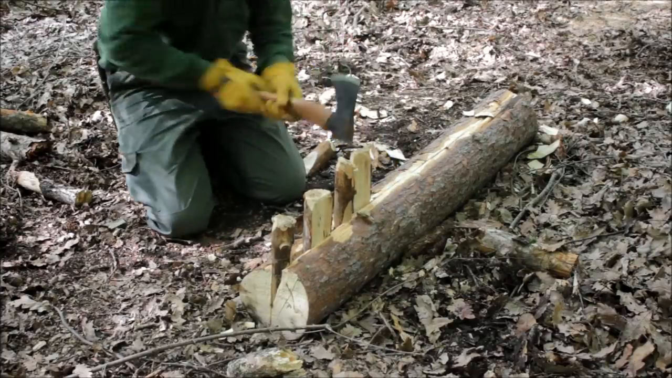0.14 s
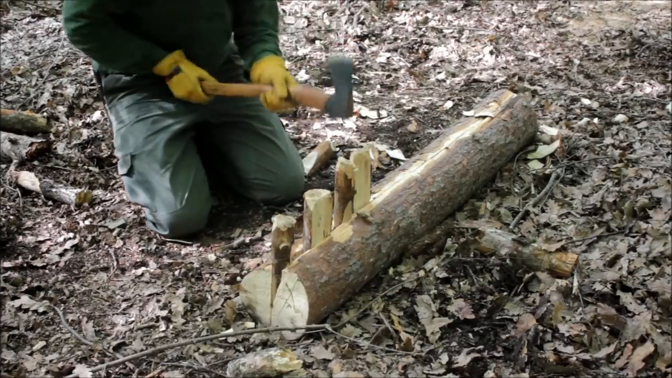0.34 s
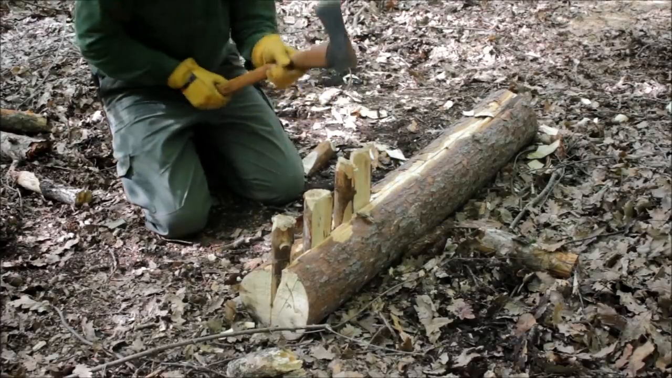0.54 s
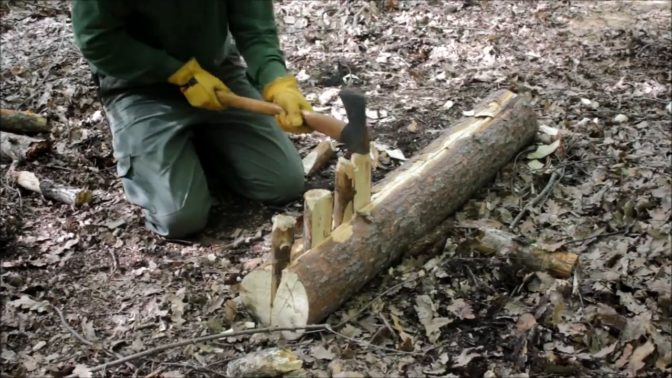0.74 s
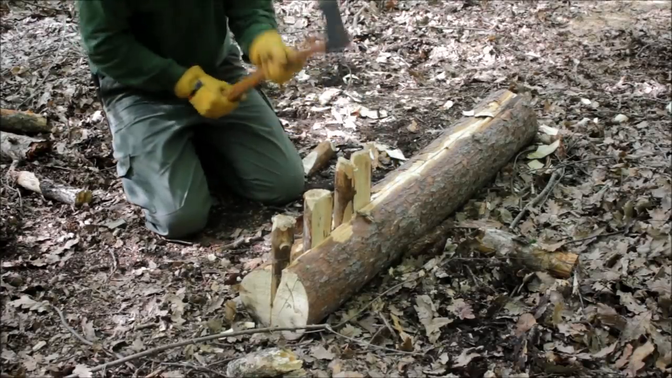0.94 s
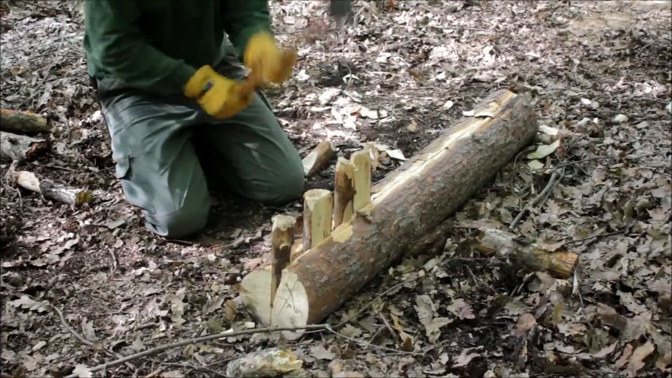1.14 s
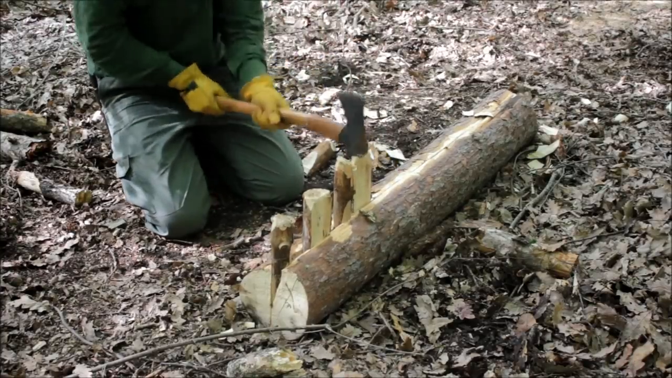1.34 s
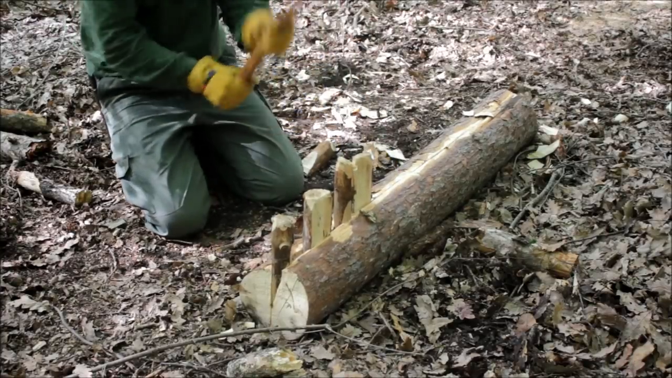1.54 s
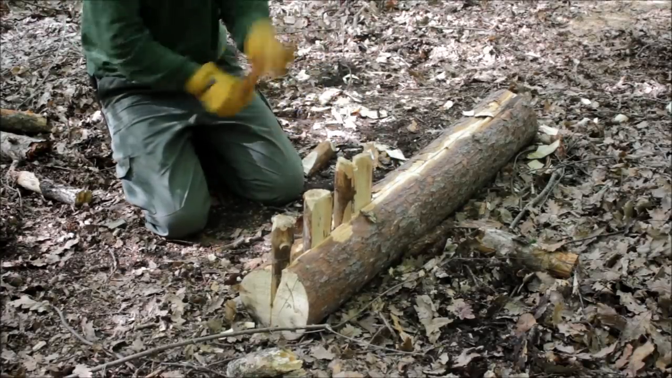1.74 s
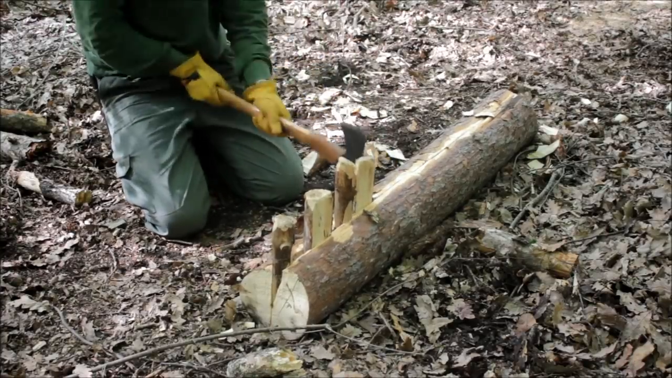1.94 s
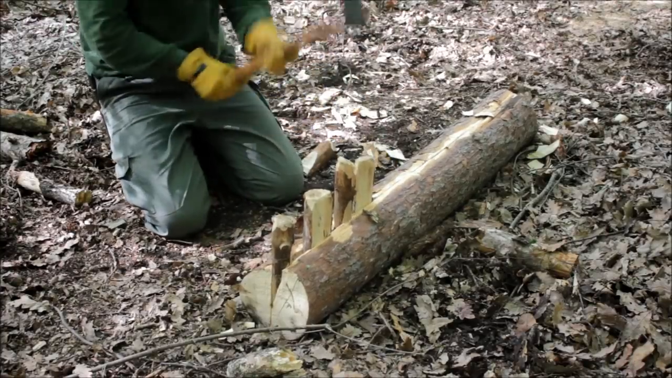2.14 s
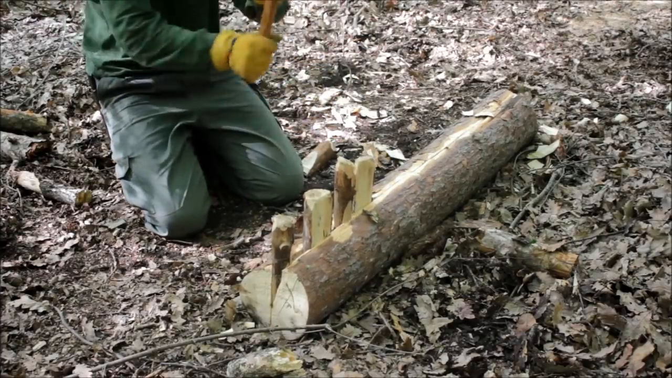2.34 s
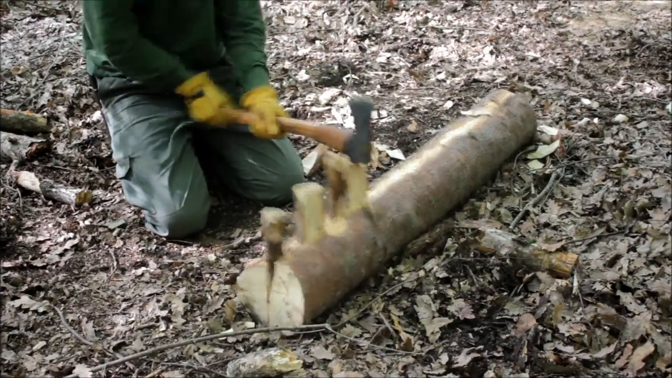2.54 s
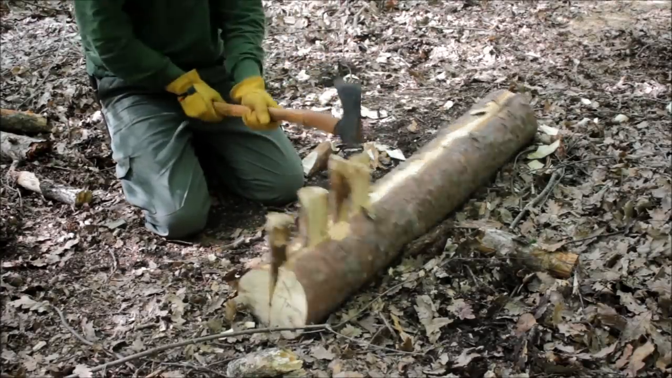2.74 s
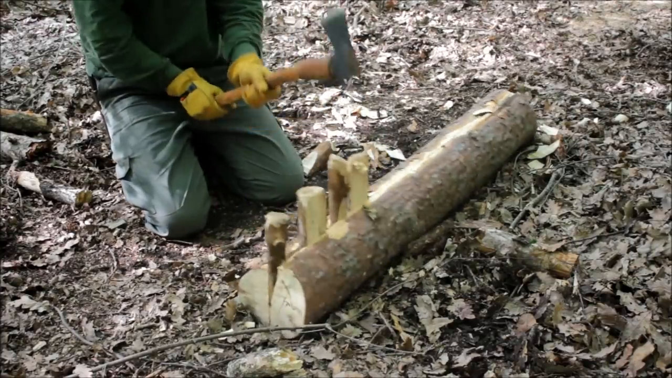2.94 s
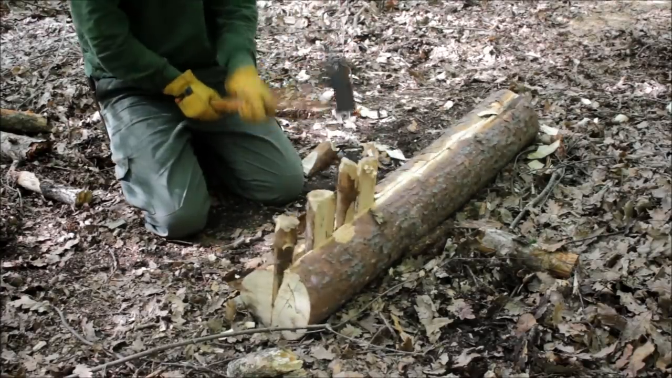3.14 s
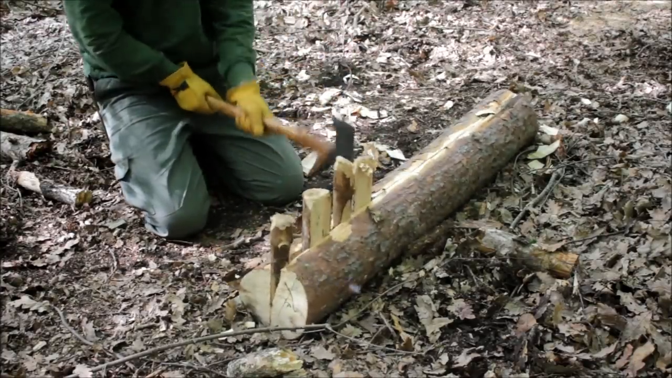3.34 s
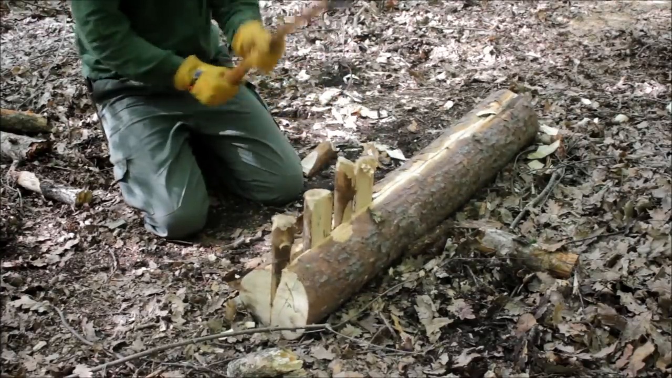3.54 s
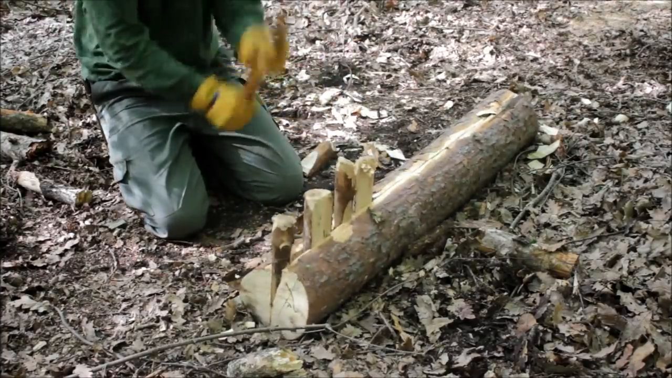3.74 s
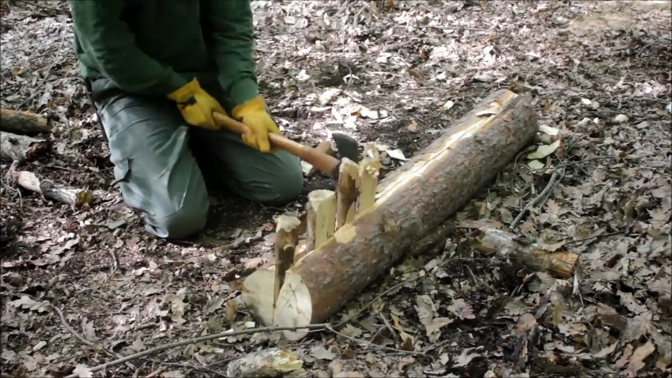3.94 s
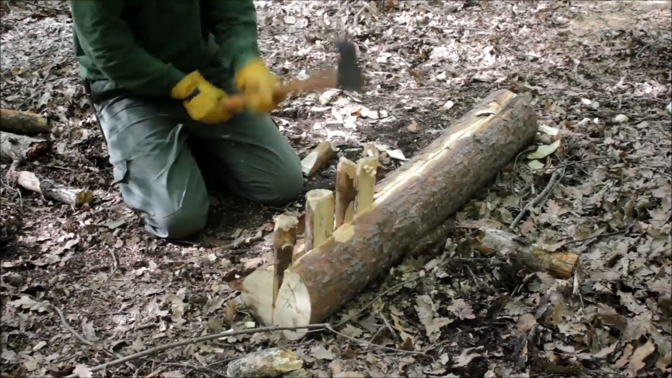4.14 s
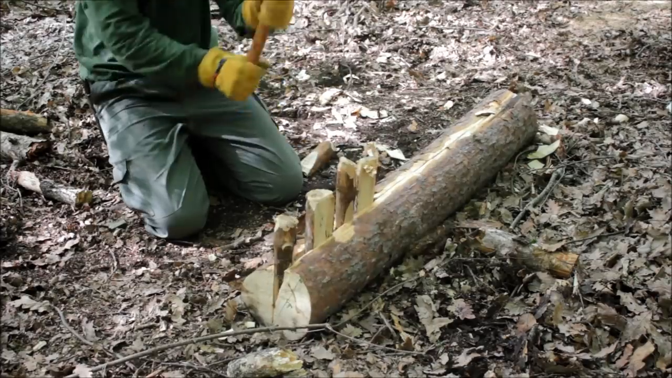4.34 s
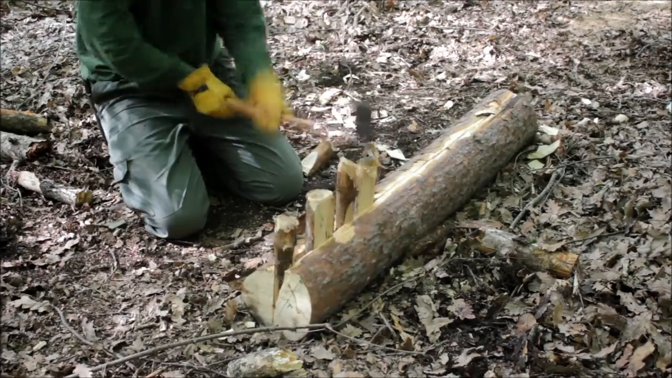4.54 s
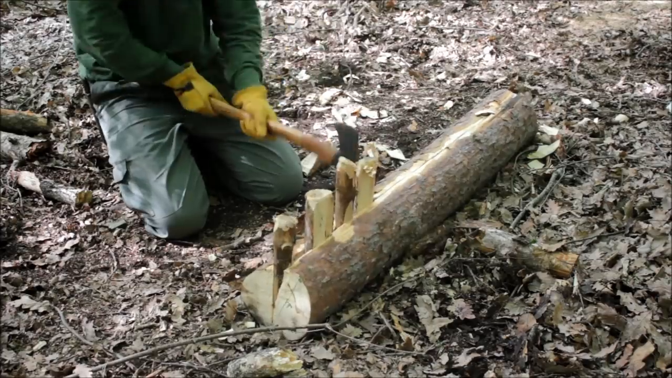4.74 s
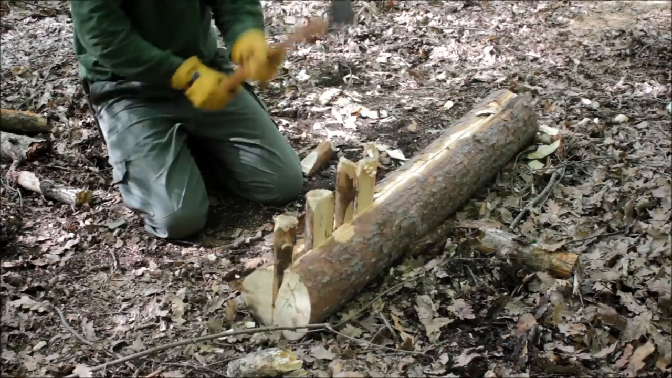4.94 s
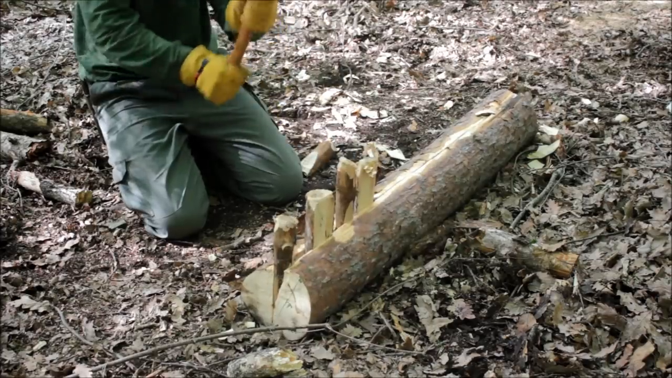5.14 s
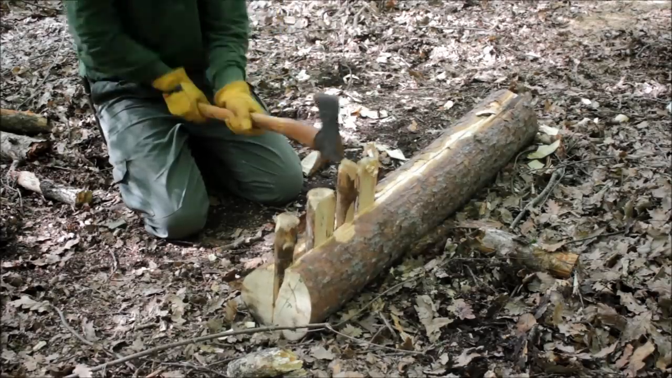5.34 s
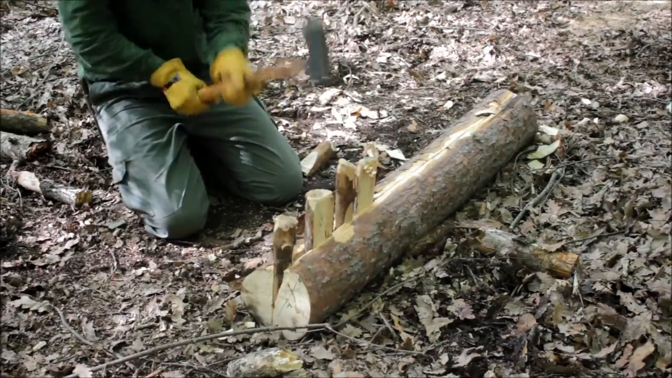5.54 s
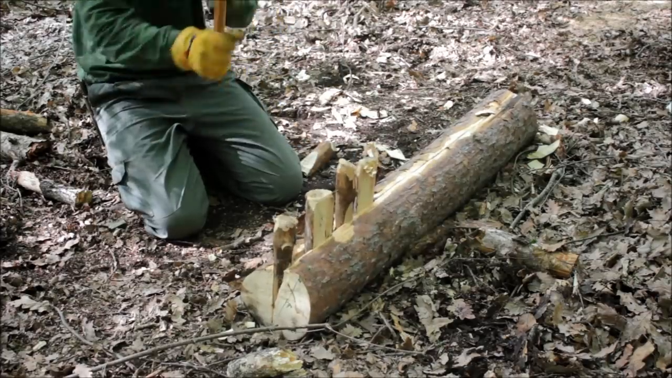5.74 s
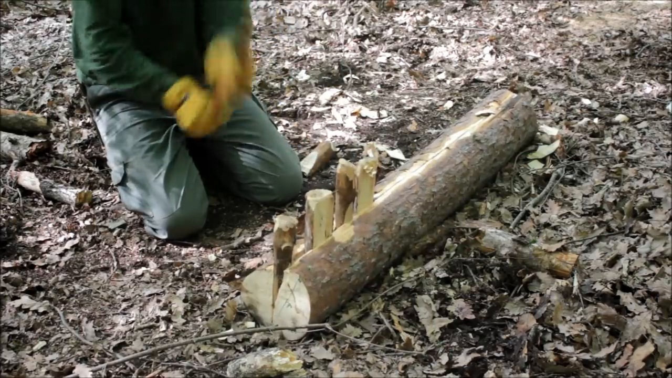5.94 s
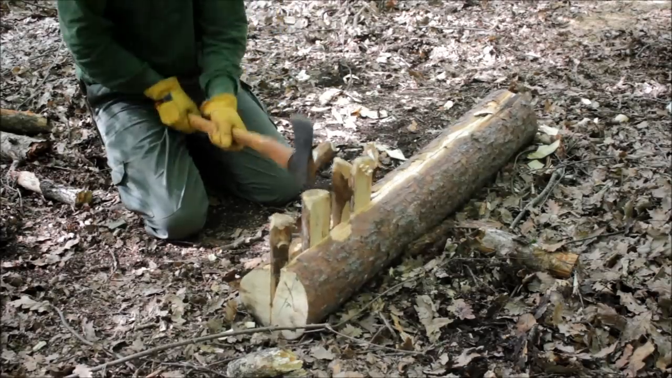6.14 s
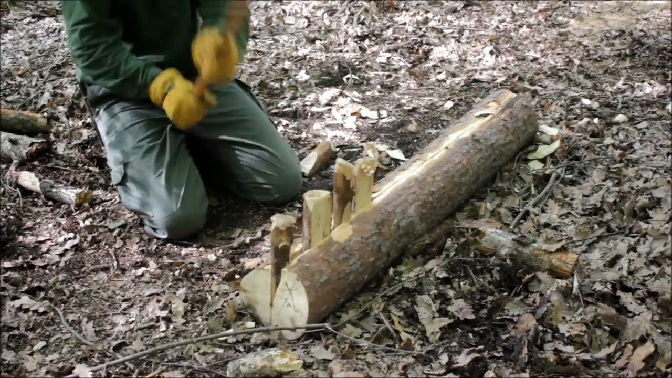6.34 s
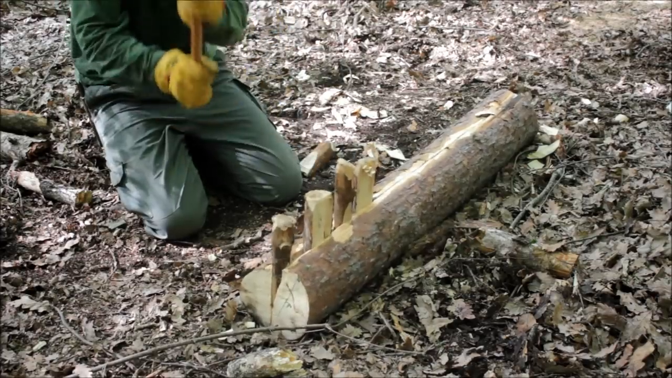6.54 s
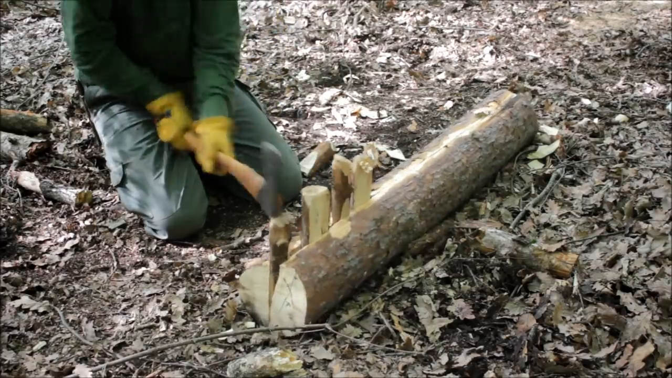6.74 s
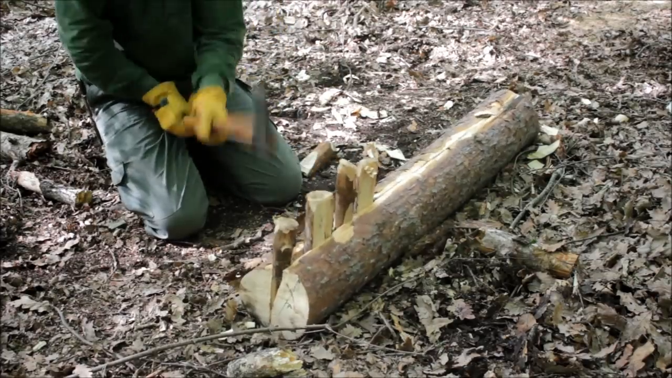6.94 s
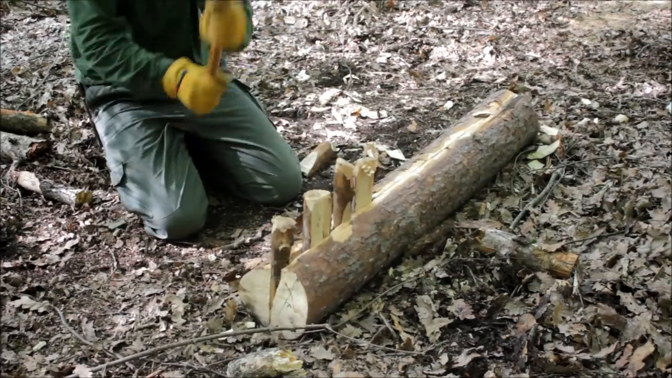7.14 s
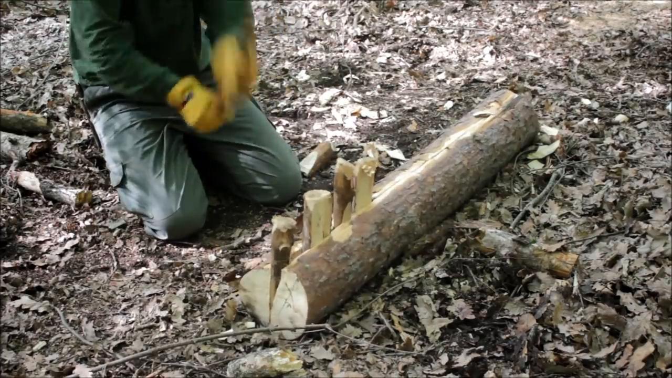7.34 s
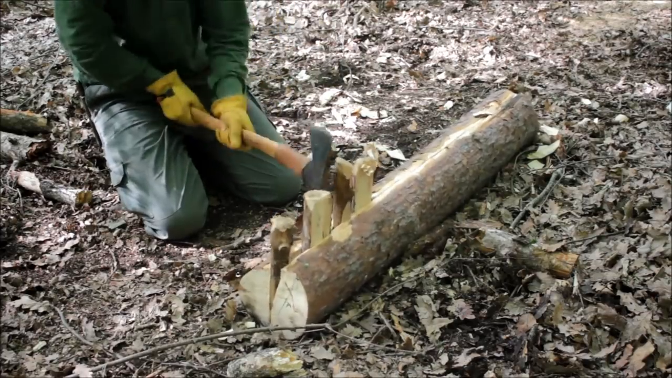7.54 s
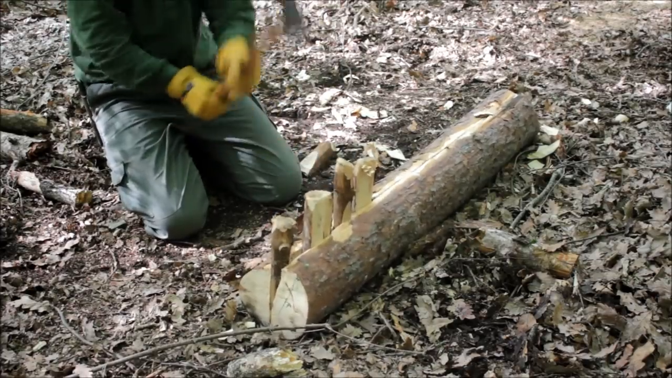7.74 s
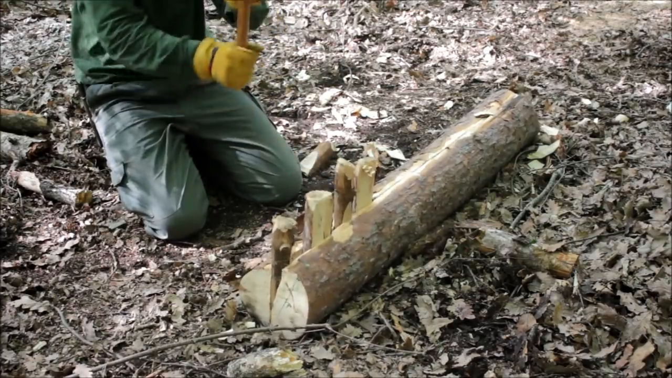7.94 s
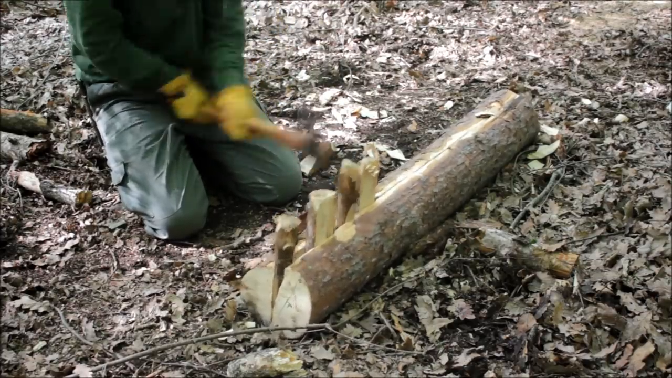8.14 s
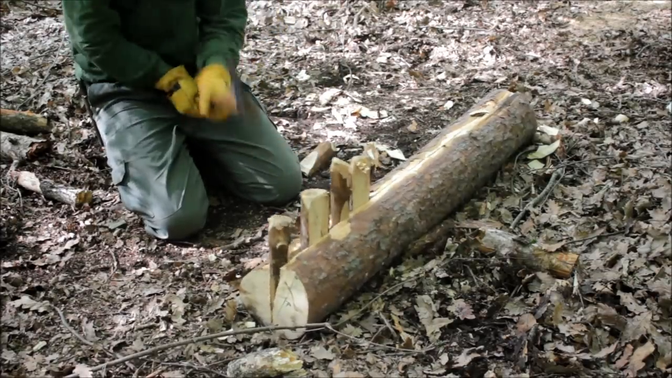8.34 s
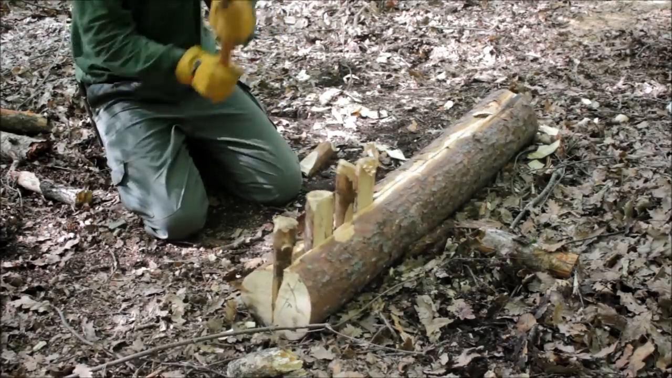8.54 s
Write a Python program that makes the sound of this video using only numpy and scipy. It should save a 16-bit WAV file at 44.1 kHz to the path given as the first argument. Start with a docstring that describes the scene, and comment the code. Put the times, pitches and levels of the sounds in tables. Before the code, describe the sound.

A soft forest hush runs throughout, opening with a thin, high bird whistle and a swish of clothes. At about 0.7 seconds a hand axe starts chopping the stubs on a log, twelve strokes roughly two thirds of a second apart, the last just after 8 seconds. Each is a close, sharp crack with a short woody ring and a crackle of splinters, briefly overloading the microphone and leaving a light echo among the trees. The stroke at 3.2 seconds is a weaker double hit, with tearing wood and a soft ground thud. The hardest blows fall near 6.7 and 7.4 seconds. Between strokes, clothes rustle and dry leaves crackle faintly. Chips tick as they land, mostly from 6 seconds on. Small birds give faint whistles and rising notes, with nearer chirps around 3 to 3.7 seconds and thin high whistles near 8 seconds.

```python
"""First a thin bird whistle and a swish of clothes sound over the hush of a leafy forest. Then a kneeling
person chops at the notched stubs of a log, twelve strokes of a hand axe. Each blow cracks the fibres, rings the
stub and the log, and overloads the microphone for a few milliseconds; leaf litter and trunks scatter it back.
Between blows clothes swish, chips and twigs tick, the axe taps lightly, and small birds call."""
import sys
import numpy as np
from scipy import signal
from scipy.fft import rfft, irfft
from scipy.io import wavfile

SR = 44100
rng = np.random.default_rng(int(sys.argv[2]) if len(sys.argv) > 2 else 0)


def waveform_to_disk(signal):
    """Save audio, clipped to [-1, 1], as 16-bit WAV at the path in sys.argv[1]."""
    frames = np.transpose(np.atleast_2d(signal))
    scaled = np.clip(frames, -1, 1) * 32767
    samples = np.round(scaled).astype(np.int16)
    wavfile.write(sys.argv[1], SR, samples)


N = 379701

# tone of the distant air: f/Hz, level/dB
AIR_SPECTRUM = [(20, -8), (50, -9), (80, -5), (120, -16.5), (200, -7), (370, -4.5), (800, -10.5),
                (2100, -17.5), (5000, -18), (12000, -48.5), (16000, -50)]
# a far bird repeats one rising note: t/s, start f/Hz
RISING_NOTES = [(2.439, 4150), (2.69, 4560), (3.13, 4600), (3.369, 4100), (6.446, 4770), (6.589, 4250),
                (7.001, 4250), (7.24, 4530), (7.801, 4190)]
# another repeats a whistle that sags in pitch: t/s, length/s
SAGGING_NOTES = [(0.752, 0.15), (4.358, 0.17), (5.959, 0.065)]
# thin high whistles: t/s, start f/Hz, end f/Hz, level/dB
THIN_NOTES = [(0.0, 7200, 7050, -44.5), (7.895, 8280, 6500, -43.5), (8.072, 6620, 6550, -39),
              (8.344, 7260, 7500, -47.5)]
# quick chirps of a nearer bird: t/s, length/s, start f/Hz, end f/Hz, level/dB
NEAR_CHIRPS = [(2.889, 0.024, 3305, 3680, -36.5), (2.92, 0.029, 3894, 4220, -32.5),
               (3.57, 0.049, 4570, 3860, -40.5), (3.593, 0.023, 3820, 3770, -32.5),
               (3.639, 0.047, 3690, 2850, -38.5), (3.776, 0.014, 4020, 3460, -40.5),
               (8.532, 0.045, 3450, 3590, -31.5)]
# tone of rubbing cloth: f/Hz, level/dB
CLOTH_SPECTRUM = [(300, -9), (1200, -12.5), (3000, -7.5), (7000, -10), (13000, -8), (16000, -14.5)]
# knees and sleeves shift on dry leaves: t/s, half length/s, relative level/dB
BODY_SHIFTS = [(0.1, 0.28, -55.5), (1.0, 0.06, -59.5), (2.3, 0.18, -64), (2.84, 0.099, -62),
               (3.18, 0.063, -67), (4.15, 0.37, -68.5), (5.44, 0.14, -66), (6.43, 0.079, -67),
               (7.33, 0.047, -55.5), (8.35, 0.25, -59)]
# the loudest ticks of chips and twigs, and light taps of the axe: t/s, level/dB, centre f/Hz
LOUD_TICKS = [(2.796, -36, 6000), (5.0632, -41, 10000), (5.201, -42.5, 7000), (5.858, -38.5, 2500),
              (6.367, -28, 4440), (6.984, -36.5, 4970), (7.288, -21.5, 2470), (7.6295, -34.5, 8000),
              (7.877, -35.5, 9000), (8.022, -36.5, 6000), (8.2125, -22.5, 8000), (8.307, -27, 7000),
              (8.432, -32, 7000)]
# soft thuds on the ground: t/s, half length/s, level/dB, centre f/Hz
GROUND_THUDS = [(3.237, 0.016, -18.5, 535), (4.081, 0.026, -32.5, 297), (8.188, 0.022, -33.5, 262)]
# bands of the forest echo: f/Hz, level/dB, t60/s (the time to fade by 60 dB)
ECHO_BANDS = [(103.3, -32, 0.53), (227, -18.5, 0.64), (340, 2, 1.78), (510, -1.5, 1.83), (800, 1, 1.57),
              (1500, -1, 1.79), (3240, 7, 1.19), (5860, 3.5, 0.82), (13940, -1, 0.47)]
# tone of splinters and shaken leaves: f/Hz, level/dB
SPLINTER_SPECTRUM = [(200, 3), (1000, 1.5), (3000, 0), (6000, -2), (10000, -3.5), (16000, -8.5)]
# a split stub tears along the grain: t/s, half length/s, level/dB
GRAIN_TEARS = [(3.217, 0.0064, -15.5), (3.234, 0.0043, -44)]
# tone of breaking fibres: f/Hz, level/dB
CRACK_SPECTRUM = [(80, -14), (250, 5), (600, -2.5), (1500, 5.5), (2800, 5), (5000, 2), (9000, -5.5),
                  (16000, -4.5)]
# the log's modes (tones it rings at as it bends), two main ones first: f/Hz, level/dB, t60/s
LOG_MODES = [(363.5, -13, 0.14), (728.6, -11.5, 0.076), (353, -29, 0.31), (226.7, -26.5, 0.12),
             (265, -22.5, 0.058), (384.5, -2, 0.024), (521.7, -14.5, 0.057), (891, -3, 0.024),
             (1155, -10.5, .04), (1170, -21, 0.061), (1583, 6, 0.009), (1675, -6, 0.024), (1935, -19, 0.03),
             (2250, -32.5, .02)]
# axe blows (the fifth stroke hits twice): t/s, force/dB, crack boost/dB, splinter boost/dB,
# first log mode boost/dB, second log mode boost/dB, low stub f/Hz, high stub f/Hz,
# high stub relative level/dB, contact edge f/Hz
AXE_BLOWS = [(0.6708, -9, 3.5, 11, -13, 4.5, 836, 1270, 2.5, 3100),
             (1.2316, -4.5, 1.5, 10.5, -5, 4.5, 585, 1155, 1.5, 3240),
             (1.8244, -3, 2.5, 13.5, -1.5, 3.5, 669, 1108, 1, 4360),
             (2.5444, 2.5, -8, 0.5, -3, 1, 855, 1364, -4.5, 1770),
             (3.2085, -13, -4, 16, -8, 0, 1124, 1460, 2, 3860),
             (3.2406, -21, -0.5, 4.5, 18, 6.5, 553, 970, -7.5, 7120),
             (3.8472, 1.5, 2.5, 12, 4, 2, 654, 1349, -3, 1750),
             (4.5772, 1.5, 1.5, 10, 3.5, 3, 911, 1098, -4, 1500),
             (5.3069, -2.5, 1.5, 10, -0.5, 6.5, 1073, 1534, -2.5, 1880),
             (6.0271, -3, 5.5, 8, 6, -3.5, 1100, 1300, -2, 2220),
             (6.7382, 3, 1.5, 10, -9, -3, 500, 1145, 0.5, 2200),
             (7.427, 3.5, -0.5, 7.5, -1, -12.5, 1093, 1327, -5, 2150),
             (8.1495, -3.5, 5.5, 11, -2, 6, 449, 1623, 4.5, 2140)]


def undb(db):
    """Turn decibels into a number to multiply by."""
    return 10 ** (np.asarray(db) / 20)


def times(length):
    """Sample times over a length in seconds."""
    return np.arange(int(length * SR)) / SR


def fade(t, t60):
    """A smooth dying away, 60 dB down at t60."""
    return np.exp(-np.log(1000) * t / t60)


def add(out, s, x):
    """Mix x into out from time s on."""
    i = max(int(s * SR), 0)
    out[i:i + len(x)] += x[:max(len(out) - i, 0)]


def swell(rows):
    """Smooth bumps in level, from rows of t/s, half length/s, level/dB."""
    t = np.arange(N) / SR
    return sum(undb(db) * np.exp(-((t - s) / half) ** 2) for s, half, db in rows)


def wander(t, points, per_second):
    """A wobbly line through random points."""
    return np.interp(t, np.arange(points) / per_second, rng.standard_normal(points))


def colour(x, points):
    """Shape the tone of x with points of f/Hz, level/dB, then scale it to a typical size (rms) of 1."""
    hz, db = np.transpose(points)
    f = np.maximum(np.fft.rfftfreq(len(x), 1 / SR), 1)
    gain = undb(np.interp(np.log(f), np.log(hz), db))
    shaped = irfft(rfft(x) * gain, len(x))
    return shaped / np.std(shaped)


def hump(count, hz, skirt_db):
    """Noise strongest at hz; skirt_db is its level two octaves to either side."""
    points = [(hz * 4.0 ** step, abs(step) * skirt_db) for step in range(-2, 3)]
    return colour(rng.standard_normal(count), points)


def grains(count, spread_db):
    """Dense clicks of uneven size."""
    clicks = rng.standard_normal(count)
    return clicks * undb(spread_db * np.minimum(rng.exponential(size=count), 2 * np.pi))


def air():
    """Forest hush over a low, distant rumble that turns quieter once."""
    level_db, drop_db, drop_at_s, drop_fade_s = -53.5, -5.5, 5.64, 0.25
    dropped = .5 + .5 * np.tanh((np.arange(N) / SR - drop_at_s) / drop_fade_s)
    rumble = undb(level_db + drop_db * dropped) * hump(N, 72.4, skirt_db=-30.5)
    return undb(level_db) * colour(rng.standard_normal(N), AIR_SPECTRUM) + rumble


def whistle(length, start_hz, end_hz, db, depth, arch_hz=0.):
    """One gliding bird note with a fast, uneven quaver; depth is its share of the pitch."""
    t = times(length)
    progress = t / length
    arch = np.sin(np.pi * progress)
    quaver = wander(t, points=100, per_second=300)
    glide_hz = start_hz + (end_hz - start_hz) * progress + arch_hz * arch
    hz = glide_hz * (1 + depth * quaver)
    return undb(db + 2 * quaver) * np.sqrt(np.abs(arch)) * np.sin(2 * np.pi * np.cumsum(hz) / SR)


def birds():
    """Four kinds of call: rising notes, sagging whistles, thin high arches and quick chirps."""
    out = np.zeros(N)
    for s, hz in RISING_NOTES:
        add(out, s, whistle(length=0.11, start_hz=hz, end_hz=hz * 1.09, db=-49.5, depth=0.035))
    sag_from_hz, sag_hz_per_s = 4620, 2300
    for s, length in SAGGING_NOTES:
        end_hz = sag_from_hz - sag_hz_per_s * length
        add(out, s, whistle(length, sag_from_hz, end_hz, db=-46.5, depth=0.0096))
    for s, start_hz, end_hz, db in THIN_NOTES:
        add(out, s, whistle(0.1, start_hz, end_hz, db, depth=0.018, arch_hz=173))
    for s, *note in NEAR_CHIRPS:
        add(out, s, whistle(*note, depth=0.038))
    return out


def clothes():
    """Cloth slides over cloth in uneven strokes, and dry leaves crackle under the knees."""
    motion = undb(-66) + swell(BODY_SHIFTS)  # a faint rustle never stops
    strokes = undb(2 * wander(np.arange(N) / SR, points=230, per_second=25))
    out = undb(8) * motion * strokes * colour(grains(N, spread_db=3.5), CLOTH_SPECTRUM)
    t = times(.02)
    for place, size, pitch in rng.random((200, 3)):
        leaf = hump(len(t), 4000 * 3 ** pitch, skirt_db=-14) * fade(t, .008)
        add(out, place * N / SR, undb(-52 + 15 * size ** 2) * leaf)
    return out


def falling_chips():
    """Chips land and the axe taps lightly, each with a dry tick and a short woody knock; the ground thuds."""
    out = np.zeros(N)
    t = times(.06)
    # fainter crumbs drop at random once the stubs have split
    from_s, crumb_db, spread_db, crumb_hz = 3.6, -40.5, 3, 8000
    crumbs = [(from_s + place * (N / SR - from_s), crumb_db + spread_db * (2 * size - 1), crumb_hz)
              for place, size in rng.random((16, 2))]
    for s, db, hz in LOUD_TICKS + crumbs:
        tick = hump(len(t), hz, skirt_db=-6.5) * fade(t, 0.02)
        knock = undb(-6) * hump(len(t), 1200, skirt_db=-25) * fade(t, 0.04)
        add(out, s, undb(db) * (tick + knock))
    for s, half, db, hz in GROUND_THUDS:
        out += hump(N, hz, skirt_db=-18.5) * swell([(s, half, db)])
    return out


def forest_echo(x):
    """Trunks scatter the sound back as many small echoes in clumps; the highest tones die first."""
    t = times(1.6)
    hz, db, t60 = np.transpose(ECHO_BANDS)
    clumps = undb(1.5 * wander(t, points=130, per_second=80))
    spectrum = rfft(clumps * grains(len(t), spread_db=2.0))
    log_f = np.log(np.maximum(np.fft.rfftfreq(len(t), 1 / SR), 1))
    echoes = np.zeros(len(t))
    for k, only_this_band in enumerate(np.eye(len(hz))):
        band = irfft(spectrum * np.interp(log_f, np.log(hz), only_this_band), len(t))
        echoes += undb(db[k]) * band * fade(t, t60[k])
    echoes *= 1 - np.exp(-t / .018)  # the first trunks stand a few metres off
    return signal.fftconvolve(x, echoes / np.linalg.norm(echoes))[:N]


def splinters():
    """Crumbs of wood and shaken leaves crackle briefly after a blow."""
    t = times(.5)
    crackle = colour(grains(len(t), spread_db=4), SPLINTER_SPECTRUM)
    rise = 1 - np.exp(-t / 0.019)
    return undb(-29.5) * crackle * fade(t, t60=0.17) * rise


def tearing():
    """A split stub rips along the grain."""
    return swell(GRAIN_TEARS) * colour(grains(N, spread_db=0.5), CRACK_SPECTRUM)


def contact(x, edge_hz):
    """A softer bite of the blade lasts longer, so tones above edge_hz come out weaker."""
    lows = signal.sosfilt(signal.butter(3, edge_hz, fs=SR, output="sos"), x)
    highs = signal.sosfilt(signal.butter(1, edge_hz, "high", fs=SR, output="sos"), x)
    return lows + undb(-9) * highs


def snap():
    """The sharp front of a blow as it leaves for the trees."""
    return undb(20) * fade(times(.01), t60=0.00024)


def crack():
    """The blade bursts through the fibres."""
    t = times(.1)
    burst = colour(rng.standard_normal(len(t)), CRACK_SPECTRUM)
    rise = 1 - np.exp(-t / .0002)
    return undb(14) * burst * fade(t, t60=0.015) * rise


def wood_ring(first_db, second_db, low_hz, high_hz, high_db):
    """The struck stub rings until the wedged blade stops it; the log rings on."""
    low_db, stub_hold_s = -1, 0.0076
    t = times(.3)
    modes = np.array(LOG_MODES)
    modes[:2, 1] += first_db, second_db  # where the blade lands decides which mode is louder
    log = sum((-1) ** k * undb(db) * np.sin(2 * np.pi * hz * t) * fade(t, t60)
              for k, (hz, db, t60) in enumerate(modes))
    stub_modes = [(low_hz, low_db), (high_hz, high_db), (715, second_db - 4)]
    stub = sum(undb(db) * np.sin(2 * np.pi * hz * t) for hz, db in stub_modes)
    stub *= np.exp(-(t / stub_hold_s) ** 2)
    rise = 1 - np.exp(-t / 0.0011)
    return (log - stub) * rise


def scene():
    """The blows and their echo, birds among the trees, small sounds near the ground."""
    blows, to_trees = np.zeros(N), np.zeros(N)
    for s, force_db, crack_db, splinter_db, *wood_settings, edge_hz in AXE_BLOWS:
        ring = undb(force_db) * wood_ring(*wood_settings)
        bite = undb(force_db + crack_db)
        add(blows, s, ring)
        add(blows, s, bite * contact(crack(), edge_hz))
        add(blows, s, undb(splinter_db) * splinters())
        add(to_trees, s, undb(-4) * ring)
        add(to_trees, s, undb(4.5) * bite * contact(snap(), edge_hz))
    blows += tearing()
    song = birds()
    echo = undb(-23) * forest_echo(to_trees) + undb(-5.5) * forest_echo(song)
    return (blows + song + echo + falling_chips() + clothes() + air())[None]


def record(dry):
    """The overloaded microphone flattens the peaks of the blows; the very highest tones are then cut."""
    top_hz = 15800
    low_pass = signal.ellip(10, .05, 70, top_hz, fs=SR, output="sos")
    return signal.sosfilt(low_pass, np.clip(dry, -1, 1))


dry = scene()
out = record(dry)
waveform_to_disk(out)
```